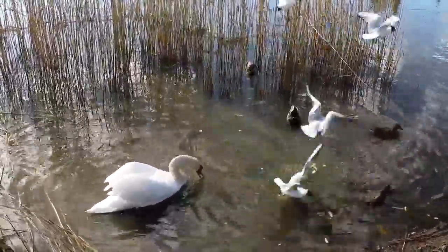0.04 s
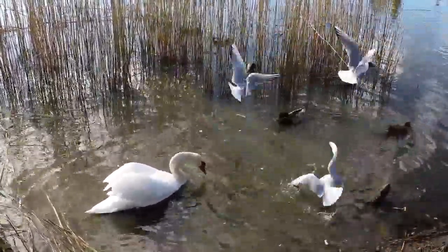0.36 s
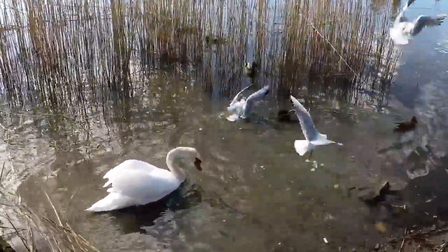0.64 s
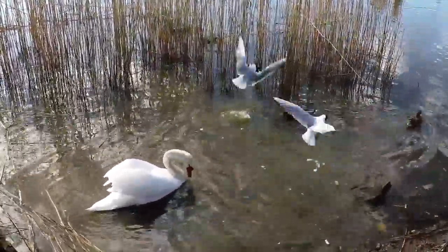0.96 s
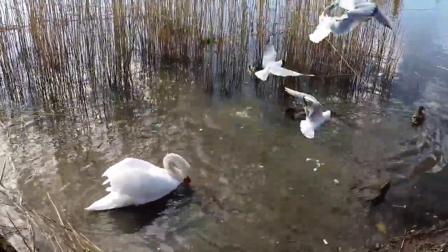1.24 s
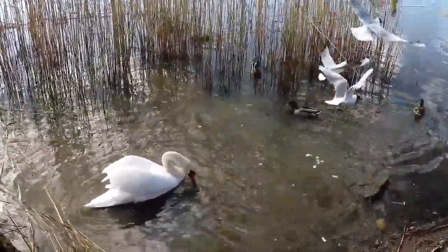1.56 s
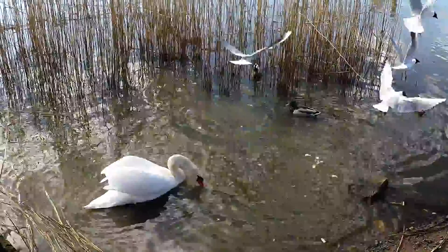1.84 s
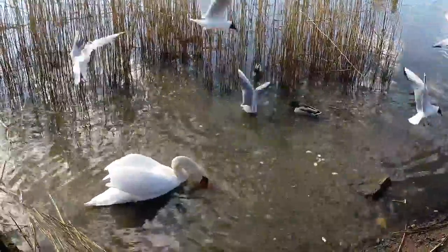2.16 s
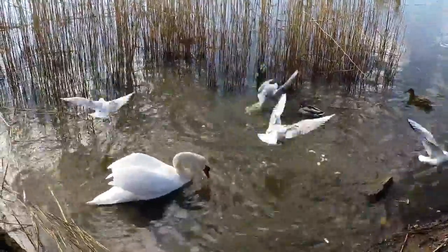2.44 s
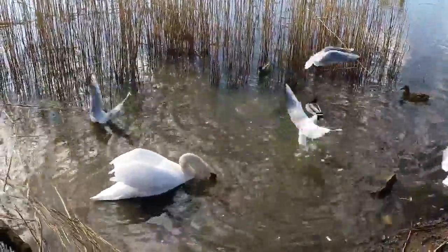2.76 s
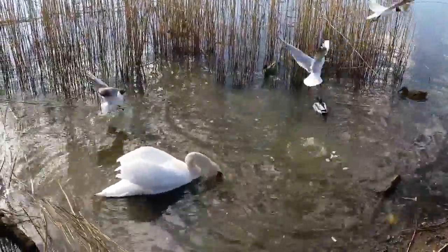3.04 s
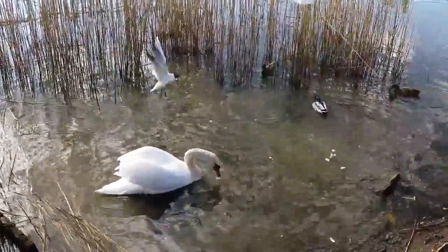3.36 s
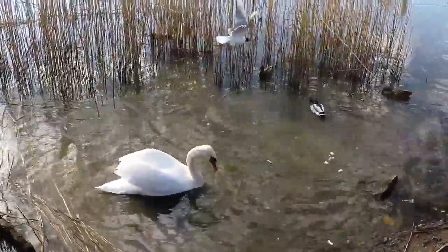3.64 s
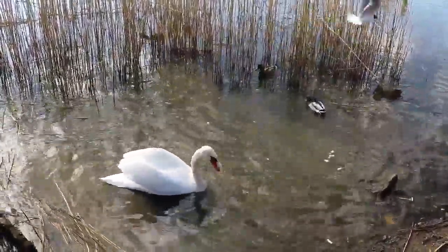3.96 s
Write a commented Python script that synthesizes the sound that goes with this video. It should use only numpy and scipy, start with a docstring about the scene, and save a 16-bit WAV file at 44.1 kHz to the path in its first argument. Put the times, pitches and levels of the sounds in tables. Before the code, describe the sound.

Gulls yelp and screech over light splashes on a pond, with low wind rumble.

```python
"""Gulls squabble over food on a shallow pond, while wind rumbles on the microphone.
First comes a run of harsh yelps, made of pulses and rushing air in a gull's throat. Gulls further off
rasp, feet and bills splash, and bubbles plop. From about 2 seconds on come clear, gliding mews, two thin
whistles, short low clucks and a few bumps of wind. Near the end one gull screeches, and a last mew meets
the strongest bump. All along, the bank returns a faint echo of the birds and the water."""
import sys
import numpy as np
from scipy import signal
from scipy.fft import rfft, irfft, next_fast_len
from scipy.io import wavfile
from scipy.ndimage import uniform_filter1d, map_coordinates

SR = 44100
rng = np.random.default_rng(int(sys.argv[2]) if len(sys.argv) > 2 else 0)


def to_wav(s):
    """Save 16-bit WAV."""
    ch = np.atleast_2d(s).T  # columns
    pcm = np.round(np.clip(ch, -1, 1) * 32767)  # PCM
    wavfile.write(sys.argv[1], SR, pcm.astype(np.int16))


N = 176400

# How a gull's throat shapes yelps and rasps. Each row: frequency in Hz, gain in dB.
GULL_THROAT = [(400, -22), (1000, -22), (1350, -1), (1850, -0.5), (2400, -3), (3000, 0), (3500, -2),
               (4050, 4), (4800, -7), (5600, -22.5), (8000, -26.5), (9300, -27.5), (10500, -28),
               (15000, -60)]


def amp(db):
    """Turns decibels into a number to multiply by."""
    return 10 ** (np.asarray(db) / 20)


def unit(x):
    """Scales a sound to an average (rms) level of 1."""
    return x / np.sqrt(np.mean(x ** 2) + 1e-20)


def add(mix, start, sound):
    """Mixes a sound in at a start time in seconds."""
    at = round(start * SR)
    sound = sound[max(-at, 0):]
    part = mix[max(at, 0):][:len(sound)]
    part += sound[:len(part)]


def colour(x, points):
    """Filters a sound. Each point: frequency in Hz, gain in dB."""
    size = next_fast_len(len(x) + 512)
    hz, db = np.transpose(points)
    gain = amp(np.interp(np.log(np.fft.rfftfreq(size, 1 / SR) + 1), np.log(hz), db))
    return irfft(rfft(x, size) * gain, size)[:len(x)]


def wander(size, hz):
    """Drifts to a new random value, roughly between -1 and 1, hz times a second."""
    knots = rng.standard_normal(8192)
    return map_coordinates(knots, [np.arange(size) * hz / SR], order=1, mode="nearest")


def phase_of(hz):
    """The running angle of a wave whose pitch changes."""
    return 2 * np.pi * np.cumsum(hz) / SR


def resonate(x, hz, width_hz):
    """Makes a sound ring around one frequency, which may glide."""
    turn = np.exp(1j * phase_of(hz * np.ones(len(x))))
    r = np.exp(-np.pi * width_hz / SR)
    return 2 * (turn * signal.lfilter([(1 - r) ** 2], [1, -2 * r, r * r], x / turn)).real


def air():
    """Soft hiss of open water, reeds and the distant flock."""
    # The tone of the hiss. Each row: frequency in Hz, gain in dB.
    hiss_tone = [(30, 12.5), (150, 8.5), (250, 1), (500, -1.5), (900, -3.5), (1400, -1.5), (2000, 1),
                 (3000, -3.5), (4200, -4), (5500, -8.5), (9000, -14), (15000, -18.5)]
    return amp(-63.5 + .5 * wander(N, hz=1.94)) * unit(colour(rng.standard_normal(N), hiss_tone))


def wind():
    """Wind on the microphone: a deep rumble that swells and sinks, with short low bumps."""
    # The tone of the rumble. Each row: frequency in Hz, gain in dB.
    rumble_tone = [(10, -37.5), (20, -2), (28, 0), (36, -7), (50, -20), (65, -20), (95, -28.5),
                   (130, -45.5), (200, -52.5), (400, -75)]
    # The strength of the rumble. Each row: time in seconds, level in dB.
    gusts = [(0.0, -37), (0.08, -39), (0.21, -47.5), (0.28, -38.5), (0.71, -36.5), (0.78, -45),
             (0.91, -36.5), (1.05, -41), (1.1, -46), (1.25, -34.5), (1.87, -46), (2.1, -36), (2.61, -40.5),
             (3.16, -35.5), (3.25, -41), (3.73, -38), (3.88, -44.5), (4.0, -33)]
    # Bumps of wind. Each row: start in seconds, fade time in seconds, level in dB, pitch in Hz.
    bumps = [(2.221, 0.053, -32, 95.4), (2.264, 0.034, -32, 89), (2.356, 0.03, -38.5, 85),
             (2.462, 0.042, -44.5, 87), (2.6, 0.055, -41.5, 89.6), (2.72, 0.056, -52, 93),
             (2.856, .04, -33.5, 90), (3.063, 0.072, -36.5, 91.7), (3.981, 0.15, -20.5, 73.4)]
    # The tone of the noise in a bump. Each row: frequency in Hz, gain in dB.
    bump_tone = [(30, -12.5), (90, 9), (170, -19.5), (300, -22), (900, -31.5), (3000, -78)]
    rumble = colour(rng.standard_normal(N), rumble_tone)
    rumble /= np.sqrt(uniform_filter1d(rumble ** 2, size=10000) + 1e-12)  # even out its level
    out = rumble * amp(np.interp(np.arange(N) / SR, *np.transpose(gusts)))
    for start, fade, db, hz in bumps:
        t = np.arange(0, 2 * fade, 1 / SR)
        push = np.sin(phase_of(hz * (1 + .06 * wander(len(t), hz=110))))
        push += amp(-10) * unit(colour(rng.standard_normal(len(t)), bump_tone))
        rise = 1 - np.exp(-(t / .0059) ** 2)
        add(out, start, amp(db) * push * rise * np.exp(-2 * (t / fade) ** 2))
    return out * signal.windows.tukey(N, .003)


def bank_echo(x):
    """Reeds and shore send back scattered reflections that die away."""
    reflections_per_s, fade_s = 2000, .34
    t = np.arange(SR * 3 // 4) / SR
    echoes = rng.standard_normal(len(t)) * (rng.random(len(t)) < reflections_per_s / SR)
    echoes *= amp(-60 * t / fade_s) * (t > .006)
    return signal.oaconvolve(x, echoes / np.linalg.norm(echoes))[:N]


def splashes():
    """Small splashes from feet and bills over a fine patter of drips."""
    # Splashes. Each row: start in seconds, level in dB, brightest frequency in Hz.
    hits = [(.638, -56.5, 5500), (.794, -52, 5800), (1.041, -48.5, 4600), (1.359, -58, 5940),
            (2.009, -57, 6900), (2.287, -62, 5750), (2.335, -63, 6130), (2.481, -56.5, 4130),
            (2.521, -55.5, 3400), (2.603, -57, 2690), (2.649, -58.5, 6200), (2.87, -72, 6000),
            (2.906, -60, 4350), (3.049, -57.5, 4800), (3.17, -60, 5800), (3.241, -59.5, 5700)]
    # The tone of falling drops. Each row: frequency in Hz, gain in dB.
    spray_tone = [(300, 2), (1000, -0.5), (2500, -7), (4500, -4), (6500, -3.5), (9000, -9.5), (15000, -12)]
    drips_per_s, drips_db, rise_s, decay_s = 130, -73.5, .002, .007
    t = np.arange(SR // 20) / SR
    drips = (rng.random(N) < drips_per_s / SR) * amp(3 * np.minimum(rng.exponential(1, N), 3))
    patter = signal.oaconvolve(drips, t * np.exp(-t / .0015))[:N] * rng.standard_normal(N)
    out = amp(drips_db) * unit(colour(patter, spray_tone))
    for start, db, hz in hits:
        drops = rng.standard_normal(len(t)) * amp(2.3 * wander(len(t), hz=680))
        ring = unit(resonate(drops, hz, width_hz=2100))
        spray = unit(unit(colour(drops, spray_tone)) + 1.3 * ring)
        add(out, start, amp(db) * spray * np.minimum(t / rise_s, 1) * np.exp(-t / decay_s))
    return out


def plops():
    """Bubbles ring briefly and rise in pitch as they surface."""
    # Bubbles. Each row: start in seconds, level in dB, starting pitch in Hz.
    bubbles = [(.056, -56, 478), (.077, -57, 830), (.394, -60, 615), (2.401, -57, 1304)]
    glide_per_s, rise_s, decay_s = 1.2, .0015, .011
    out = np.zeros(N)
    t = np.arange(SR // 16) / SR
    for start, db, hz in bubbles:
        ring = np.sin(phase_of(hz * (1 + glide_per_s * t)))
        add(out, start, amp(db) * ring * np.minimum(t / rise_s, 1) * np.exp(-t / decay_s))
    return out


def voice(hz, rough, throat, jitter, jitter_hz=900, split=0):
    """Pulses and rushing air pass through a bird's throat. Rough is the air's share; jitter shakes pitch."""
    size = len(hz)
    phase = phase_of(hz * (1 + jitter * wander(size, jitter_hz)))
    pulses = sum(np.cos(k * phase + k * k) * amp(3 * wander(size, hz=70)) for k in range(1, 15))
    pulses *= 1 + split * wander(size, hz=202) * np.cos(phase / 2)  # strong and weak pulses take turns
    puffs = (1 + .35 * np.cos(phase)) * rng.standard_normal(size)
    tone, breath = unit(colour(pulses, throat)), unit(colour(puffs, throat))
    rough = np.clip(rough, 0, 1)
    return unit(np.sqrt(1 - rough) * tone + np.sqrt(rough) * breath)


def flutter(size, hz, depth_db):
    """The uneven throb of a rasping voice."""
    return unit(amp(depth_db * np.sin(phase_of(hz * (1 + .11 * wander(size, hz=60))))))


def rasps():
    """Far gulls: rapid puffs of hiss make the throat ring at two frequencies."""
    # Rasps. Each row: start and length in seconds, level in dB, top of the lower ring in Hz,
    # upper ring in Hz, then the upper ring and the hiss in dB compared with the lower ring.
    calls = [(0.119, 0.18, -60, 2300, 4240, -6.5, -16), (.294, 0.13, -56.5, 2130, 4040, -12.5, -15),
             (0.454, .2, -59, 2230, 4000, -6, -16), (0.81, 0.048, -54, 2590, 3830, -20, -28),
             (.865, 0.063, -61.5, 2340, 4050, -11, -15), (1.341, .22, -60.5, 2140, 4140, -5, -16),
             (1.669, .18, -60, 2170, 4320, -6.5, -6), (1.95, 0.2, -60.5, 2230, 4050, -0.5, -4),
             (2.271, 0.2, -65, 1910, 4140, -14, 0), (2.985, 0.14, -69, 2120, 4100, -17, -10),
             (3.55, 0.14, -63.5, 2320, 4300, -7, -18)]
    out = np.zeros(N)
    for start, length, db, lower_hz, upper_hz, upper_db, hiss_db in calls:
        size = int(length * SR)
        arch = np.sin(np.pi * np.linspace(0, 1, size)).clip(0)
        puffs = rng.standard_normal(size) * flutter(size, hz=76, depth_db=2.3)
        width_hz = 430 * amp(.5 * (hiss_db + 11))  # hissier calls ring less sharply
        sound = unit(resonate(puffs, lower_hz * (1 - .094 * (1 - arch)), width_hz))
        sound += amp(upper_db) * unit(resonate(puffs, upper_hz, width_hz=540))
        sound += amp(hiss_db) * unit(colour(puffs, GULL_THROAT))
        add(out, start, unit(sound) * amp(db) * arch ** .22)
    return out


def clucks():
    """Each cluck is one or a few slow pulses that ring dully."""
    # Clucks. Each row: start and length in seconds, relative level in dB, ring frequency in Hz.
    calls = [(1.977, .02, -64.5, 1690), (2.264, .004, -57, 2520), (2.892, .028, -61, 1620),
             (3.476, .022, -59, 2210), (3.598, .025, -59, 1900), (3.763, .02, -56, 1860),
             (3.875, .03, -53.5, 2350)]
    pulses_per_s, decay_s = 135, .0039
    out = np.zeros(N)
    t = np.arange(SR // 50) / SR
    for start, length, db, hz in calls:
        for delay in np.arange(0, length, 1 / pulses_per_s):
            puff = resonate(rng.standard_normal(len(t)) * np.exp(-t / decay_s), hz, width_hz=820)
            add(out, start + delay + rng.normal(0, .00057), amp(db + rng.normal(-1.5, 1)) * unit(puff))
    return out


def whistles():
    """The voice breaks upward into a thin tone and its octave, which sag as they fade."""
    # Whistles. Each row: start and length in seconds, starting level in dB, starting pitch in Hz.
    calls = [(1.934, 0.068, -59.5, 3330), (3.366, 0.13, -56.5, 3120)]
    out = np.zeros(N)
    for start, length, db, hz in calls:
        size = int(length * SR)
        progress = np.linspace(0, 1, size)
        phase = phase_of(hz * (1 - .1 * progress ** 2.5 + .009 * wander(size, hz=700)))
        tone = amp(-31 * progress ** 2) * np.sin(phase)
        octave = amp(-15 - 4.2 * progress + 3 * wander(size, hz=78)) * np.sin(2 * phase)
        level = amp(db + 2 * wander(size, hz=125)) * signal.windows.tukey(size, .15)
        add(out, start, np.sqrt(2) * (tone + octave) * level)
    return out


def screech():
    """One long, hoarse, throbbing cry."""
    # The course of the cry. Each row: time in seconds, level in dB, pitch in Hz.
    curve = [(3.6, -67, 1210), (3.628, -60.5, 1256), (3.65, -48.5, 1304), (3.69, -47, 1336),
             (3.755, -50, 1294), (3.82, -54.5, 1212), (3.86, -69, 1167)]
    # The screeching throat. Each row: frequency in Hz, gain in dB.
    throat = [(600, -37), (1300, -16), (2000, -4), (2650, -1.5), (3200, 3), (3950, 4.5), (4600, -4),
              (5400, -17), (7000, -15.5), (9000, -55), (15000, -39)]
    times, db, hz = np.transpose(curve)
    t = np.arange(times[0], times[-1], 1 / SR)
    out = np.zeros(N)
    cry = voice(np.interp(t, times, hz), rough=.35, throat=throat, jitter=.06, split=.4)
    add(out, times[0], cry * amp(np.interp(t, times, db)) * flutter(len(t), hz=45.8, depth_db=2))
    return out


def mews():
    """Gliding calls with a weak lowest tone and shimmering overtones; the voice growls at the ends."""
    # One list for each mew. Each row: time in seconds, pitch in Hz, level in dB,
    # hoarseness from 0 to 1, gain in dB of the harmonics above the third.
    calls = [
        [(1.86, 1014, -91, 0.1, -9), (1.885, 1190, -51.5, 0, -9), (1.9, 1300, -63, .05, 6),
         (1.92, 1340, -87, .2, 0)],
        [(2.655, 917, -75, 0.2, -3), (2.692, 1027, -59.5, 0.4, 4), (2.718, 1149, -55.5, 0.55, 1),
         (2.727, 1192, -40.5, 0, 0), (2.745, 1197, -40.5, 0, 6), (2.764, 1172, -40.5, 0, -7),
         (2.786, 1048, -47, 0.02, 4.5), (2.797, 903, -60, .5, 2), (2.812, 870, -61, 0.7, 0)],
        [(2.812, 1186, -67, .2, -2), (2.86, 1200, -60.5, 0, -4), (2.885, 1184, -59.5, 0.1, -9),
         (2.895, 1094, -70, 0.3, -6)],
        [(3.305, 963, -83, 0.5, 0), (3.328, 1164, -49, 0.02, -10), (3.338, 1317, -60, 0.12, 2),
         (3.378, 1290, -65, .3, 15)],
        [(3.927, 960, -61, 0.2, 2), (3.939, 1070, -51, 0.13, 10), (3.946, 1131, -49, 0, 11),
         (3.953, 1148, -37, 0, -1), (3.97, 1198, -46, 0, 7), (3.988, 1275, -46.5, 0.07, -3),
         (4.0, 1280, -48, .03, -2)],
    ]
    # The gain of the third harmonic in dB, one number for each mew.
    third_gains = [-15, 2, -5.5, -12, -5]
    # The throat when the voice is clear. Each row: frequency in Hz, gain in dB.
    clear_throat = [(600, -40), (1200, -15.5), (1900, 18.5), (2350, 6), (3550, 6.5), (4700, -7),
                    (6000, -9.5), (7200, -16.5), (8500, -36), (14000, -25)]
    # The throat when it growls. Each row: frequency in Hz, gain in dB.
    growl_throat = [(600, -16), (1400, -3), (2100, 0), (3800, -6), (5500, -7.5), (7500, -18), (10000, -23),
                    (15000, -32)]
    out = np.zeros(N)
    for curve, third_db in zip(calls, third_gains):
        times, *columns = np.transpose(curve)
        t = np.arange(times[0], times[-1], 1 / SR)
        hz, db, hoarse, upper_db = (np.interp(t, times, column) for column in columns)
        hoarse = np.clip(hoarse, 0, 1)
        pitch = hz * (1 + .01 * (1 + 2 * np.sqrt(hoarse)) * wander(len(t), hz=700))
        phase = phase_of(pitch)
        tone = np.zeros(len(t))
        for k in range(1, 10):
            gain_db = np.interp(k * pitch, *np.transpose(clear_throat))
            gain_db += third_db * (k == 3) + upper_db * (k > 3)
            shimmer_db = .5 * k * wander(len(t), hz=110)
            tone += np.cos(k * phase + k * k) * amp(gain_db + shimmer_db)
        growl = voice(hz * 2 / 3, rough=.25, throat=growl_throat, jitter=.03)
        breath = amp(-22) * unit(colour(rng.standard_normal(len(t)), clear_throat))
        sound = np.sqrt(1 - hoarse) * unit(tone) + np.sqrt(hoarse) * growl + breath
        add(out, times[0], sound * amp(db))
    return out


def yelps():
    """Pitch and level rise and fall together; the voice wavers, and is clearest at the top."""
    # Yelps. Each row: loudest moment, rise and fall in seconds, level in dB, top pitch in Hz, pitch sag
    # and roughness from 0 to 1, then gains in dB for the throat's low, middle and treble ranges.
    calls = [(.0, .026, 0.031, -47.5, 907, .22, 0.94, 4, 0, 7.5),
             (.195, 0.028, 0.034, -44, 1013, 0.35, 0.44, -2.5, -1, -2.5),
             (0.464, 0.041, 0.049, -49, 897, 0.09, 0.55, -2.5, -3.5, 0),
             (0.583, .028, 0.049, -41.5, 997, 0.17, 0.82, -1, 1, 3),
             (.768, 0.038, 0.044, -38, 1010, 0.17, 0.48, -0.5, 0.5, 4),
             (.855, 0.039, 0.027, -40.5, 1009, 0.24, 0.08, -2, -3, 3),
             (.94, 0.027, 0.057, -40.5, 1000, 0.23, 0.94, -1.5, 0, -4.5),
             (.978, 0.031, 0.033, -40, 1110, .2, 0.37, -1, 1.5, 7),
             (.999, 0.017, 0.017, -39.5, 1045, .18, 0.12, 1, -4, 2.5),
             (1.1, .033, 0.062, -40, 1052, .2, 0.64, 1.5, 2, 0.5),
             (1.213, .026, 0.029, -42, 1009, 0.19, 0.61, -2.5, -2, -4.5),
             (1.314, .04, 0.043, -42.5, 1026, 0.22, 0.44, 3.5, 2, -0.5),
             (1.43, 0.034, 0.04, -37.5, 932, 0.14, 0.33, 1, -1.5, -6.5),
             (1.637, 0.022, 0.023, -51, 833, 0.03, 0.2, 3.5, -8, 7.5)]
    # The scratchy top of a yelp. Each row: frequency in Hz, gain in dB.
    scratch_tone = [(3000, -19), (5200, 5), (6200, 4), (8000, 14), (9300, -0.5), (10500, -5.5), (13000, -3),
                    (15000, -6)]
    out = np.zeros(N)
    for peak, rise, fall, db, hz, sag, rough, low_db, middle_db, treble_db in calls:
        t = np.arange(-1.3 * rise, 1.4 * fall, 1 / SR)
        away = np.where(t < 0, -t / rise, t / fall)  # 0 at the loudest moment, above 1 at the ends
        pitch = hz * (1 - sag * np.tanh(2 * away ** 2) + .04 * rough * wander(len(t), hz=130))
        throat = [(f, gain + low_db * (f < 2100) + middle_db * (2100 < f < 3750) + treble_db * (f > 5200))
                  for f, gain in GULL_THROAT]
        air_share, jitter = .3 * rough + .48 * away ** 2, .08 * rough
        sound = voice(pitch, air_share, throat, jitter, jitter_hz=380, split=.7 * rough)
        scratch = voice(pitch, rough=.5, throat=scratch_tone, jitter=jitter)
        sound += amp(treble_db - 27) * scratch * flutter(len(t), hz=210, depth_db=4)
        level = amp(db - 21 * away ** 1.23) * signal.windows.tukey(len(t), .25)
        add(out, peak + t[0], sound * level * flutter(len(t), hz=126.4, depth_db=2))
    return out


def scene():
    """Birds and water with their echo, over wind and soft hiss."""
    pond = yelps() + rasps() + screech() + mews() + whistles() + clucks() + splashes() + plops()
    return (pond + amp(-15) * bank_echo(pond) + wind() + air())[None]


def record(dry):
    """Cuts off the treble above 15250 Hz."""
    low_pass = signal.firwin(511, 15250, window=("kaiser", 9), fs=SR)
    return signal.oaconvolve(dry, low_pass[None], "same")


dry = scene()
out = record(dry)
to_wav(out)
```